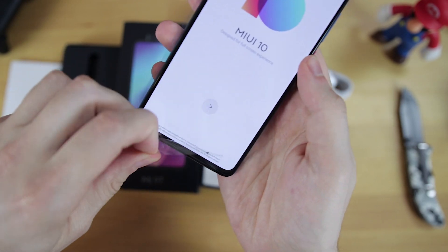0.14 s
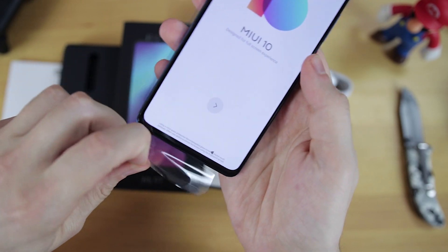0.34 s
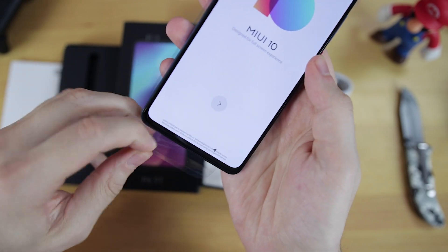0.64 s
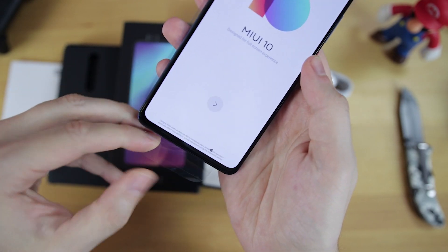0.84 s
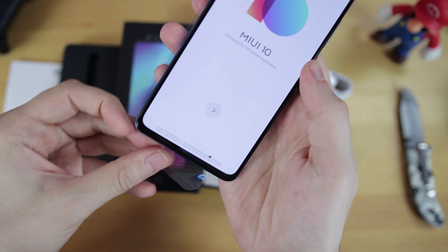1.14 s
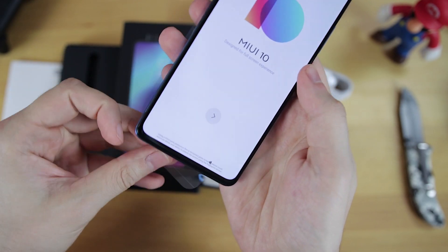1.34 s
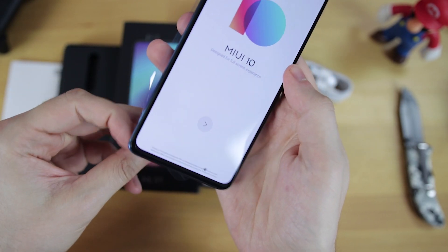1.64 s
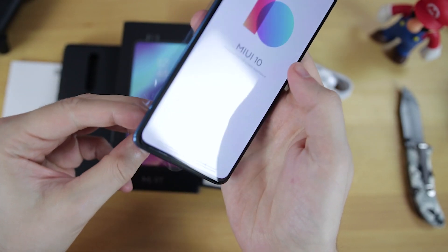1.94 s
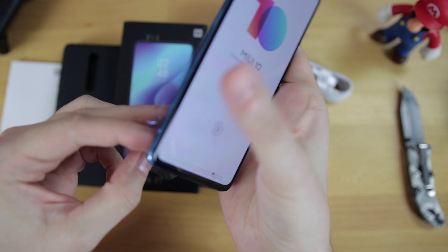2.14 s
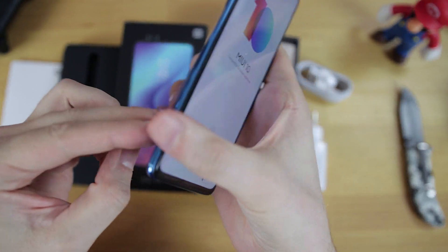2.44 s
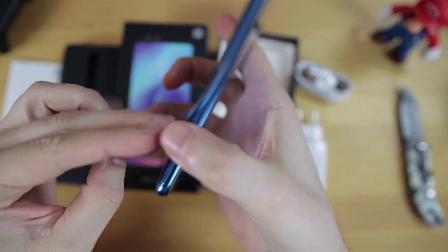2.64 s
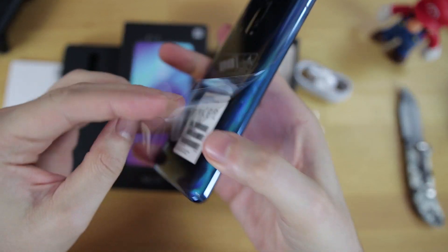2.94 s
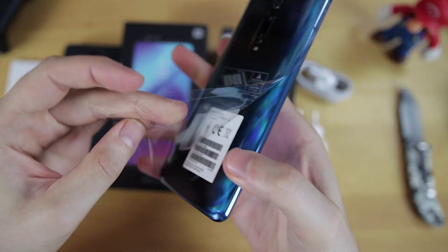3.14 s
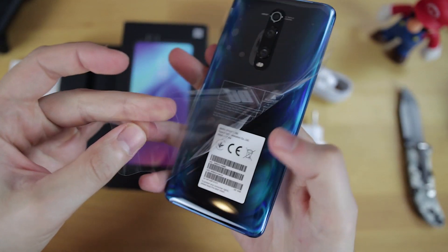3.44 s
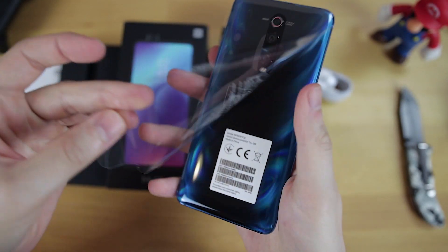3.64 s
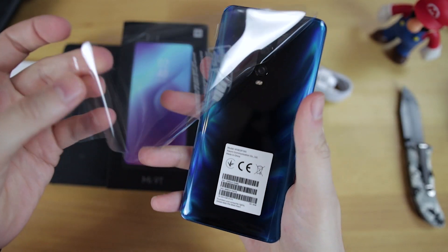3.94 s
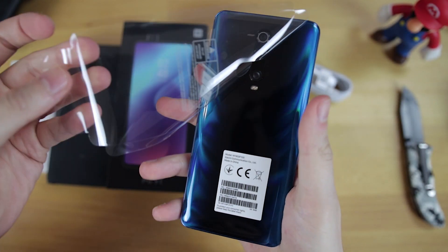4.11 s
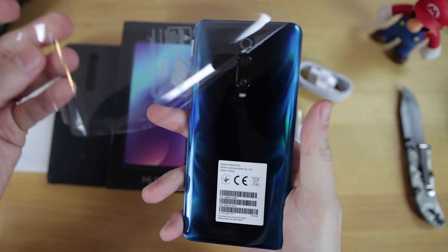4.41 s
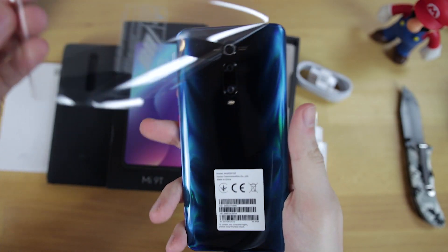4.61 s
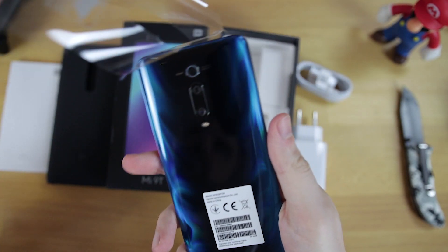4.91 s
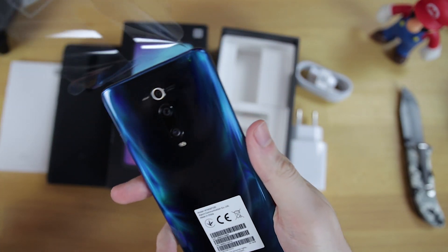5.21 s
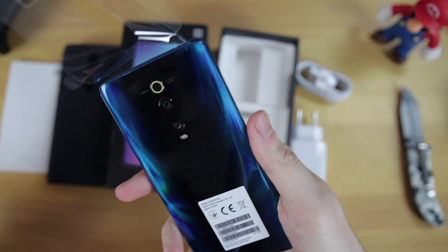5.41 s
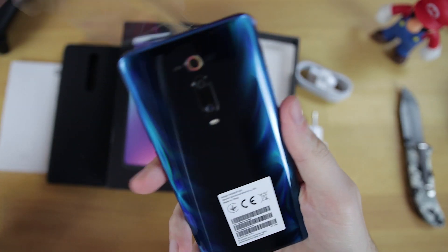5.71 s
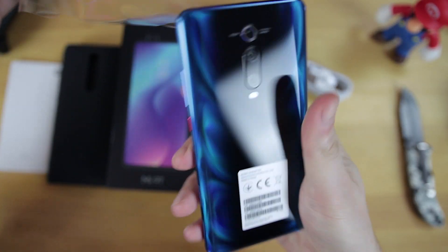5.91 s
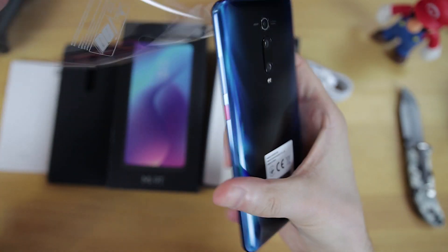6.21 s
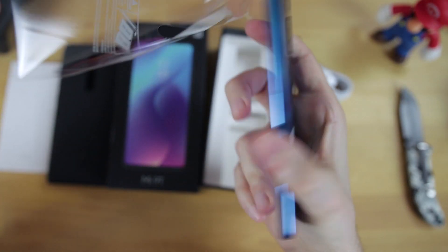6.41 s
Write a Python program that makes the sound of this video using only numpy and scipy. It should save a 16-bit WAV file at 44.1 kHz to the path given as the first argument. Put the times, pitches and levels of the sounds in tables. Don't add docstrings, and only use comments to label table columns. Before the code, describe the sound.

Close to the microphone in a quiet furnished room, fingers pick at thin plastic film on a phone. A few hard snaps come early, then small crackles and skin rubbing, another flapping snap, a dense patch of fine crinkling as the sheet lifts, a lull, and finally a cluster of loud cracks as it comes free. Faint ventilation and low hum stay beneath.

```python
import sys
import numpy as np
from scipy import signal
from scipy.fft import rfft, irfft
from scipy.io import wavfile
from scipy.ndimage import uniform_filter1d

SR = 44100
rng = np.random.default_rng(int(sys.argv[2]) if len(sys.argv) > 2 else 0)


def transcribe(u):
    v = np.clip(np.atleast_2d(u).T, -1, 1)
    q = np.round(v * 32767).astype(np.int16)
    wavfile.write(sys.argv[1], SR, q)


def decibels_to_gain(level_db):
    exponent = np.asarray(level_db, float) / 20
    return 10 ** exponent


N = 289296

# (frequency [Hz], density [dB per Hz])
AIR_SPECTRUM = [(15, -35), (25, -10.5), (60, -12), (90, -7), (170, -9.5), (300, 1), (400, -5), (840, -9),
                (1000, -14.5), (1900, -25.5), (3800, -28), (9000, -28.5), (15300, -25), (15850, -26)]
AIR_DB = -62
# (frequency [Hz], level [dB rms])
HUM_LINES = [(59.2, -80.5), (118.4, -71), (177.6, -73.5), (301.5, -78)]
# (time [s], level [dB])
HUM_SWELL = [(0, 5), (.4, 1), (.52, 10), (.7, 2.5), (1.1, 5), (1.6, -4.5), (2.2, 8), (3.6, 2), (5.5, 4),
             (6, 11), (6.56, 8)]
# (frequency [Hz], density [dB per Hz])
INPUT_HISS_SPECTRUM = [(40, -4), (600, -3.5), (2500, -7), (10000, 1), (12800, -0.5), (13500, -3.5),
                       (16000, -12)]
INPUT_HISS_DB, CUTOFF_HZ = -77.5, 17300

# (peak time [s], length [s], hiss level [dB], scuff level [dB])
STROKES = [(0.288, 0.043, -72, -60.5), (0.637, 0.14, -80, -67), (0.734, .1, -65, -85),
           (1.447, .15, -72, -87), (1.815, 0.22, -65, -68), (2.156, 1, -67.5, -71),
           (2.305, 0.2, -56, -64.5), (2.654, 0.091, -51.5, -55.5), (2.732, 0.29, -54.5, -63),
           (2.9, 0.14, -72, -68), (3.066, 0.79, -63, -72.5), (3.148, .15, -70, -79),
           (3.43, 0.2, -61.5, -66), (3.633, 0.3, -57.5, -72), (3.783, 0.26, -61.5, -66),
           (3.962, 0.24, -70, -68), (4.26, 0.56, -74, -71.5), (4.99, 0.12, -77, -68.5),
           (5.316, 0.6, -78, -68), (5.598, 0.14, -53, -85), (5.673, 0.074, -66, -72),
           (5.943, 0.65, -58, -67), (6.142, 0.23, -56.5, -85), (6.211, 0.12, -47, -64),
           (6.279, 0.25, -61, -69), (6.57, 0.12, -50.5, -63)]
STROKE_FADE_DB, ATTACK_SHARE, RESTING_HISS_DB, RESTING_SCUFF_DB = 33, 0.96, -74, -86.5
# (frequency [Hz], density [dB per Hz])
RUB_SPECTRUM = [(2000, -2.5), (3500, -5), (5500, -5.5), (8000, -1), (10500, -5.5), (12500, -4), (15800, -4)]
RUSTLE_EDGES_HZ = [1500, 3000, 5000, 7000, 9500, 12500, 17000]
RUSTLE_SWELL_DB = 1.0

# (start time [s], length [s], mean energy [dB])
CRINKLES = [
    (0.162, 0.23, -41.5),
    (1.598, 0.36, -41),
    (3.334, 0.14, -44),
    (3.688, 0.084, -34.5),
    (4.007, 0.12, -46),
    (5.3, 0.12, -56),
    (5.993, 0.12, -42),
]
CRINKLE_SPREAD_DB, CRINKLE_TILT_DB = -0.5, 5
# (time [s], energy [dB], treble tilt [dB])
PICKING = [(.1839, -46.5, 8), (.2055, -32.5, 5), (.4722, -34, 15), (.5455, -34, -16), (.5839, -23.5, 5),
           (.6924, -38, 25), (.7158, -32.5, 0), (.8405, -36, 6), (1.015, -51, -21), (1.0823, -27.5, 3),
           (1.2966, -19.5, 17), (1.3596, -28.5, 16), (1.4066, -22, 13), (1.4294, -25, 10),
           (1.445, -26.5, 7), (1.4713, -33, 9), (1.5811, -27, 7), (1.7951, -37, -3), (1.8212, -34, -9),
           (1.8591, -38, -10), (1.9889, -34.5, 4), (2.031, -32.5, -20), (2.2403, -24, 16), (2.2953, -23, 7),
           (2.3033, -28, -2), (2.3126, -27, 4), (2.3291, -28, -2), (2.5673, -39, 5), (2.6398, -30, 4),
           (2.6655, -29, 12)]
# (time [s], energy [dB], treble tilt [dB])
PEELING = [(2.9484, -37, 16), (3.1305, -26, -15), (3.4443, -25.5, -15), (3.548, -26, 1), (3.5822, -37, -2),
           (3.6066, -35, 8), (3.6194, -32, 10), (3.637, -20, 9), (3.6534, -39, -7), (3.668, -32, 2),
           (3.681, -30.5, 0), (3.6914, -30, 6), (3.7203, -35, 6), (3.7443, -43, 1), (3.7691, -28, 7),
           (3.782, -30, 2), (3.81, -35, -1), (3.816, -21, 5), (3.847, -27, 1), (3.8533, -28.5, 18),
           (3.9135, -39, 16), (4.0095, -22, 2.5), (4.046, -31.5, -10), (4.077, -31.5, 2), (4.17, -31, 1),
           (4.1823, -20.5, 4), (4.262, -30.5, 4)]
# (time [s], energy [dB], treble tilt [dB])
LETTING_GO = [(4.423, -37.5, 5), (4.4455, -25.5, 2), (4.482, -37.5, 1), (4.549, -33.5, 3), (4.5955, -33, 0),
              (4.6251, -37, 4), (4.6769, -28.5, 5), (4.7, -38, 1), (4.7173, -39, 10), (4.7442, -31.5, 12),
              (4.769, -33, 17), (4.9832, -44, 19), (5.2001, -14, 16.5), (5.2144, -24.5, 11),
              (5.229, -34, 6), (5.25, -34.5, 5), (5.4494, -25.5, 2), (5.51, -39, 15), (5.6693, -26, 7),
              (6.009, -36, 8), (6.0434, -38, 16), (6.061, -26.5, 9), (6.0724, -30.5, 14), (6.0797, -36, 0),
              (6.5217, -33, -3)]
CREASE_MS, CREASE_DB, SLOWER_PER_DB = 0.95, -29, 0.2
FAINT_DB = -18
# (frequency [Hz], width [Hz], level [dB])
FILM_MODES = [(3540, 4500, -4), (6620, 6100, -5), (7770, 1860, 25.5), (12000, 4400, 17), (16700, 4700, 8)]
# (time [s], frequency [Hz], energy [dB])
FLAPS = [(0.2, 2850, -32), (0.3536, 1080, -9), (.4371, 1970, -9), (1.1147, 1780, -18), (1.418, 584, -23),
         (1.46, 477, -26.5), (1.8684, 2500, -29), (2.0295, 830, -21.5), (2.0484, 1190, -27.5),
         (2.279, 840, -26), (2.34, 2840, -25.5), (2.348, 2330, -19), (2.6505, 640, -28),
         (2.6728, 473, -20.5), (2.7266, 995, -8), (3.1248, 930, -23), (3.4029, 580, -22),
         (3.5307, 1290, -21), (3.6289, 1320, -24.5), (4.0352, 380, -29), (4.832, 530, -23),
         (4.8344, 1780, -25.5), (5.5226, 1460, -16), (5.652, 1200, -29), (5.6866, 1140, -16.5),
         (5.7213, 1180, -11), (5.8556, 1970, -14), (5.9791, 655, -23), (6.0797, 352, -28.5),
         (6.1664, 845, -15)]
FLAP_MS, FLAP_ROOM_DB = 5.1, -0.5
FLAP_WIDTH_HZ, FLAP_ROOM_WIDTH_HZ = 61, 400
# (time [s], energy [dB], treble tilt [dB], length [ms])
SNAPS = [(.3522, -14.5, 9, 1.1), (.3542, -2.5, 6, 1.9), (.4371, -6, 4, 0.75), (1.1147, -4, 4.5, 2.8),
         (1.46, -24.5, -7, 5.6), (2.28, -18.5, 8, 6.2), (2.348, -20.5, 6, 5.9), (2.6466, -19.5, 17, 2.2),
         (2.6521, -19.5, 12, 4.9), (2.721, -31, 5, 7.4), (2.7267, -3, 5, 6), (3.1256, -24, 26, 2.8),
         (3.5314, -23.5, -29, .81), (3.6283, -29, 5, 6.3), (4.8259, -20, 23, 0.84), (4.8315, -17, -1, 1.6),
         (4.8348, -7.5, 10.5, 0.75), (4.838, -18.5, -14, 1.5), (5.5234, -5.5, 0, 1.3),
         (5.6864, -0.7, 11.5, 0.89), (5.7215, -2.5, 1.5, 1.4), (5.7558, -2, -6, 2.4), (5.7671, -4, 1, 2.3),
         (5.847, -25, -5, 4.9), (5.8556, -3, 3, 2), (6.1672, -8.5, 1, 1.4), (6.5404, -28, -4, 16)]

# (time [s], frequency [Hz], energy [dB])
THUDS = [(0.355, 375, -14.5), (.356, 517, -19), (.438, 835, -16.5), (1.118, 334, -18), (2.242, 107, -27.5),
         (2.669, 198, -26), (2.729, 344, -18), (2.73, 108, -22), (3.403, 560, -17.5), (3.415, 775, -30),
         (4.835, 135, -30), (5.524, 259, -24.5), (5.555, 497, -24.5), (5.69, 49.7, -29),
         (5.693, 258, -21.5), (5.766, 240, -16.5), (5.855, 322, -15), (5.856, 845, -16),
         (5.981, 225, -26.5)]
THUD_CYCLES, THUD_CUT_HZ = 5.9, 44
# (time [s], frequency [Hz], energy [dB], t60 [ms])
RINGS = [(.3545, 12000, -19, 4), (0.3546, 2040, -14, 2.5), (.438, 3680, -14, 10), (.4385, 2060, -17.5, 16),
         (.439, 2230, -15.5, 13), (1.1152, 540, -9.5, 9.7), (1.116, 630, -9, 14.6), (1.119, 730, -15, 21),
         (.355, 1510, -13.5, 10), (.4375, 1130, -24, 6.1), (5.524, 970, -21, 3.7), (2.73, 2980, -16.5, 6.9),
         (1.1157, 1220, -22, 17), (5.524, 2780, -15.5, 4.8), (5.687, 4140, -26, 3.3),
         (5.767, 2630, -17, 6.5), (1.115, 3500, -23, 7.7), (2.35, 2230, -31, 8), (2.35, 2600, -33, 8),
         (2.73, 1490, -14.5, 8.7), (5.5234, 15300, -3, 2.2), (5.5228, 12000, -5.5, 3.8),
         (5.524, 5660, -5.5, 1.5), (5.6863, 6470, -1, 1.8), (5.722, 1276, -13, 13), (5.736, 1410, -22, 5.9),
         (5.758, 1780, -10, 0.84), (5.79, 2680, -14, 10), (5.855, 3310, -9.5, 9.1), (6.167, 4280, -6, 2.2)]
# (time [s], frequency [Hz], energy [dB], t60 [ms])
TICKS = [(1.8585, 5360, -34, 2), (1.9306, 3500, -47, 1), (1.931, 7500, -48, 1), (1.94, 8000, -44, 0.99),
         (2.03, 3400, -29, 2.3), (2.03, 1400, -32, 2), (2.049, 1700, -34, 2), (2.606, 13000, -42, .8),
         (.367, 12500, -24, 1.5), (2.707, 12000, -38, 2), (2.03, 650, -30, 5), (2.049, 700, -31, 5),
         (2.0483, 2900, -31, 2.3), (2.28, 5400, -24, 2.1), (2.2795, 11000, -24, 1), (2.2403, 12000, -30, 1),
         (2.349, 3600, -25, 2.3), (2.349, 6700, -23.5, 2), (1.0155, 5100, -42, 4), (.845, 7000, -41, 2),
         (.834, 12000, -44, 1), (1.084, 5200, -31, 5), (1.084, 6400, -36, 3), (.5965, 9000, -38, 2),
         (.399, 8500, -32, 1.5), (3.913, 8400, -40, 2), (6.271, 14000, -42, 1), (6.555, 12000, -34, 1),
         (2.915, 1440, -39, 3), (3.348, 7400, -45, .8), (3.378, 1400, -41, 4), (3.392, 1500, -37, 5),
         (3.4442, 2600, -31, 3), (3.444, 1100, -37, 4), (3.695, 8300, -38, 1), (3.705, 8300, -37, 1),
         (3.733, 8000, -40, 1)]
# (time [s], frequency [Hz], energy [dB], t60 [ms])
LATE_TICKS = [(5.326, 6000, -46, .8), (5.342, 6500, -52, .8), (5.389, 4500, -47, .8),
              (5.407, 4500, -48, .8), (5.462, 13000, -42, .8), (5.535, 9000, -24, .8),
              (5.535, 4000, -20, 2), (5.574, 14000, -30, .8), (5.652, 1350, -25, 6.8),
              (5.662, 1300, -32, 5), (5.671, 1350, -31, 5), (5.698, 4700, -18, 1.8), (5.745, 1250, -23, 6),
              (5.848, 1700, -18.5, 3.7), (5.976, 13000, -45, .8), (5.99, 2800, -33, 2.9),
              (5.995, 13000, -40, .8), (6.002, 13000, -38, 0.73), (6.037, 7500, -33, 1),
              (6.037, 13500, -36, .8), (6.05, 7500, -36, 1), (3.63, 5500, -28, 1.5), (3.74, 12500, -38, .8),
              (3.758, 12500, -42, .8), (4.07, 8000, -34, 1), (4.037, 4000, -32, 1.1)]
SINGING_S = [.447, .45, .365, .37, 1.145, 1.13, 1.14, 1.125, 2.36, 2.36, 2.33, 2.74, 2.98, 3.05, 3.68, 3.66,
             3.7, 5.56, 5.57, 5.79, 5.87, 6.07, 6.06, 6.21, 6.21, 6.26, 6.54]
# (rise [s], fall [s], frequency [Hz], level [dB])
SINGING = [(.006, .2, 2000, -56), (.006, .18, 3700, -62), (.006, .12, 8000, -55), (.01, .1, 500, -55),
           (.02, .12, 630, -49), (.01, .12, 780, -54), (0.022, .12, 470, -51), (.006, 0.15, 2400, -61),
           (.006, .2, 2450, -65), (.01, .1, 7000, -64), (.06, .08, 5300, -63), (.006, 0.14, 1500, -54),
           (.15, .25, 13200, -70), (.2, .15, 8400, -68), (.12, 0.13, 8250, -64), (.1, 0.13, 5300, -65),
           (.1, .15, 12800, -67), (.03, .15, 6000, -55), (.04, .15, 12500, -58), (.02, .12, 3000, -50),
           (.006, .12, 3150, -53), (.15, .15, 8000, -63), (.15, .15, 12000, -65), (.04, 0.072, 9600, -56),
           (.04, 0.12, 4330, -58), (.05, .15, 7000, -63), (.06, .1, 7900, -61)]
SINGING_WIDTH_SHARE, SINGING_FADE_DB = .14, 25

# (delay [ms], energy [dB])
ECHOES = [(.8, -11.5), (2.5, -18.5), (10.5, -17.5), (16, -23.5), (24, -22.5)]
# (frequency [Hz], t60 [s])
ROOM_T60 = [(150, 1), (500, 0.4), (1500, 0.43), (4000, 0.39), (9000, 0.39), (16000, 0.26)]
# (frequency [Hz], level [dB])
ROOM_COLOUR = [(150, -18), (500, 5.5), (1500, 2.5), (4000, -2), (9000, -5), (16000, -6)]
# (time [s], level [dB])
OPENNESS = [(.35, 1), (.44, 4), (1.1, 2), (1.3, 0.5), (2.73, -2), (3.4, -1), (4.83, 1.5), (5.2, -1.5),
            (5.52, 1), (5.7, 6.5), (5.86, -2), (6.17, -5)]
ROOM_DB, ROOM_GAP_MS = -10, 7.3
STEADY_TOP_HZ, TOP_GATE_DB, TOP_JUMP = 15850, -55, 5


def rms_one(x):
    return x / np.sqrt(np.mean(x ** 2) + 1e-20)


def at_hz(points, hz):
    points = np.array(points)
    return np.interp(np.log(hz), np.log(points[:, 0]), points[:, 1])


def at_time(points):
    return np.interp(np.arange(N) / SR, *np.transpose(points))


def band(x, low_hz, high_hz, order=2):
    edges_hz = [low_hz, min(high_hz, .45 * SR)]
    return signal.sosfilt(signal.butter(order, edges_hz, "band", fs=SR, output="sos"), x)


def resonance(x, hz, width_hz):
    r = np.exp(-np.pi * width_hz / SR)
    poles = [1, -2 * r * np.cos(2 * np.pi * hz / SR), r * r]
    return signal.lfilter([(1 - r * r) / 2, 0, (r * r - 1) / 2], poles, x)


def drift(rate_hz):
    r = np.exp(-80 * np.pi * rate_hz / SR)
    slow = signal.lfilter([1], [1, -2 * r, r * r], rng.standard_normal(N // 40 + 2002))[2000:]
    return np.interp(np.arange(N) / 40, np.arange(len(slow)), rms_one(slow))


def coloured(x, spectrum):
    hz = np.maximum(np.fft.rfftfreq(N, 1 / SR), 1)
    inside = (hz > spectrum[0][0] / 2) & (hz < spectrum[-1][0])
    return rms_one(irfft(rfft(x) * decibels_to_gain(at_hz(spectrum, hz)) * inside, N))


def add(out, s, sound, energy_db):
    i = int(s * SR)
    sound = sound[:N - i]
    out[i:i + len(sound)] += sound * decibels_to_gain(energy_db) / np.sqrt(np.sum(sound ** 2) + 1e-20)


def uneven_slips(size, uneven_db, most):
    return rng.standard_normal(size) * decibels_to_gain(uneven_db * np.minimum(rng.exponential(1, size), most))


def background():
    t = np.arange(N) / SR
    swell_db = at_time(HUM_SWELL)
    hum = np.zeros(N)
    for hz, db in HUM_LINES:
        level = decibels_to_gain(db - 2.0 + swell_db + 3.5 * drift(19.0))
        hum += level * np.sin(2 * np.pi * hz * t + .5 * drift(0.4))
    gust = decibels_to_gain(1.96 * drift(12.3))
    air = coloured(rng.standard_normal(N), AIR_SPECTRUM)
    rumble = band(air, 12, 900, order=1)
    return decibels_to_gain(AIR_DB) * (air + (gust - 1) * rumble) + hum


def stroke_levels():
    t = np.arange(0, N, 64) / SR
    s, length_s, hiss_db, scuff_db = np.transpose(STROKES)[:, :, None]
    fade_db = STROKE_FADE_DB * np.maximum((s - t) / ATTACK_SHARE, t - s) / length_s
    levels = []
    for db, rest_db in ((hiss_db, RESTING_HISS_DB), (scuff_db, RESTING_SCUFF_DB)):
        loudest_db = np.maximum(np.max(db - fade_db, axis=0), rest_db)
        levels.append(np.interp(np.arange(N) / SR, t, loudest_db))
    return levels


def rubbing():
    hiss_db, scuff_db = stroke_levels()
    slips = uneven_slips(N, uneven_db=3.8, most=5)
    rustle = np.zeros(N)
    for k, (low_hz, high_hz) in enumerate(zip(RUSTLE_EDGES_HZ, RUSTLE_EDGES_HZ[1:])):
        rustle += (-1) ** k * band(slips, low_hz, high_hz) * decibels_to_gain(RUSTLE_SWELL_DB * drift(3.2))
    hiss = coloured(rustle, RUB_SPECTRUM) * decibels_to_gain(hiss_db + .5 * drift(51))
    catches = rng.standard_normal(N) * (0.017 + (rng.random(N) < 250 / SR))
    hollow = resonance(resonance(catches, hz=1450, width_hz=450), hz=1400, width_hz=600)
    pips = rms_one(hollow) + .3 * rms_one(band(catches, 300, 3000))
    return hiss + rms_one(pips) * decibels_to_gain(scuff_db + 2.0 * drift(34))


def buckle(length_ms, uneven_db, size=1024, count=25):
    t = np.arange(size) / SR * 1000 / max(length_ms, .3)
    rise = np.minimum(t * length_ms / (0.63 + 0.053 * length_ms), 1) ** 2
    shape = rise * (np.exp(-1.8 * t ** 0.88) + 0.099 * np.exp(-t))
    spectrum = rfft(shape * uneven_slips(size, uneven_db, most=4))
    broad = np.sqrt(uniform_filter1d(np.abs(spectrum) ** 2, size=count))
    return irfft(spectrum / broad, size) * np.clip(20 * shape, 0, 1)


def creases():
    small = PICKING + PEELING + LETTING_GO
    for s, length_s, db in CRINKLES:
        for u, a, b in zip(rng.random(size=5), *rng.standard_normal(size=(2, 5))):
            small = small + [(s + length_s * u, db + CRINKLE_SPREAD_DB * a, CRINKLE_TILT_DB + 6 * b)]
    rows = list(SNAPS)
    for s, db, tilt_db in small:
        length_ms = CREASE_MS * np.exp(SLOWER_PER_DB * np.clip(CREASE_DB - db, 0, 12))
        rows.append((s, db, tilt_db, length_ms))
    return rows


def crack(volley, strengths_db, tilt_db):
    film = volley
    for (hz, width_hz, db), strength_db in zip(FILM_MODES, strengths_db):
        film = film + decibels_to_gain(db + strength_db - 11.5) * resonance(volley, hz, width_hz)
    return rms_one(band(film, 2720, 5330)) - decibels_to_gain(tilt_db) * rms_one(band(film, 8800, 20600))


def flap(volley, hz, width_hz):
    ring = resonance(volley, hz, width_hz + 0.032 * hz)
    snap = band(volley, hz / 2.2, hz * 2.2, order=1)
    return band(rms_one(ring) + 1.8 * rms_one(snap), hz / 3.7, hz * 5.1)


def cracks():
    direct, around = np.zeros((2, N))
    click = np.eye(1, 1024)[0]
    for s, energy_db, tilt_db, length_ms in creases():
        strengths_db = rng.normal(0, 7.9, len(FILM_MODES))
        count = 25 if energy_db > FAINT_DB else 70
        volley = buckle(length_ms, uneven_db=3.5, count=count)
        add(direct, s - .0004, crack(volley, strengths_db, tilt_db), energy_db)
        add(around, s - .0004, crack(click, strengths_db, tilt_db), energy_db)
    for s, hz, energy_db in FLAPS:
        volley = buckle(FLAP_MS, uneven_db=0.0)
        add(direct, s, flap(volley, hz, FLAP_WIDTH_HZ), energy_db)
        add(around, s, flap(click, hz, FLAP_ROOM_WIDTH_HZ), energy_db + FLAP_ROOM_DB)
    return direct, around


def thuds_and_rings():
    out, t = np.zeros(N), np.arange(8192) / SR
    knocks = [(s, hz, db, 1000 * THUD_CYCLES / hz) for s, hz, db in THUDS]
    for s, hz, energy_db, t60_ms in RINGS + TICKS + LATE_TICKS + knocks:
        decay = decibels_to_gain(-60000 * t / t60_ms) * (1 - np.exp(-t * hz))
        add(out, s, np.sin(2 * np.pi * hz * t) * decay, energy_db)
    return band(out, THUD_CUT_HZ, 20000)


def room(direct, around):
    t = np.arange(int(.6 * SR)) / SR
    tail, edges_hz = 0, 100 * 2 ** np.arange(0, 7.6, .5)
    for low_hz, high_hz in zip(edges_hz, edges_hz[1:]):
        hz = np.sqrt(low_hz * high_hz)
        decay_db = at_hz(ROOM_COLOUR, hz) - 60 * t / at_hz(ROOM_T60, hz)
        tail = tail + band(rng.standard_normal(len(t)), low_hz, high_hz) * decibels_to_gain(decay_db)
    spectrum = rfft(tail)
    fine, broad = (uniform_filter1d(np.abs(spectrum) ** 2, size=size) for size in (36, 240))
    tail = irfft(spectrum * np.sqrt(broad / fine), len(t))
    tail = tail * np.clip((t * 1000 - ROOM_GAP_MS + 10.0) / 11.0, .05, 1)
    tail = tail * np.clip((t[-1] - t) / .1 - .3, 0, 1)
    answer = np.zeros(N)
    add(answer, 0, tail, ROOM_DB)
    for ms, db in ECHOES:
        add(answer, ms / 1000, buckle(2.9 + 0.2 * ms, uneven_db=-0.5), db)
    answer = signal.sosfilt(signal.ellip(12, .5, 70, 15800, fs=SR, output="sos"), answer)
    around = around * decibels_to_gain(at_time(OPENNESS))
    return direct + signal.fftconvolve(around, answer[:len(t)])[:N]


def singing():
    out, t, slips = np.zeros(N), np.arange(N) / SR, rng.standard_normal(N)
    for s, (rise_s, fall_s, hz, db) in zip(SINGING_S, SINGING):
        near = slice(max(int((s - 2 * rise_s) * SR), 0), int((s + 2 * fall_s) * SR))
        width_hz = SINGING_WIDTH_SHARE * hz
        fade_db = SINGING_FADE_DB * np.maximum((s - t[near]) / rise_s, (t[near] - s) / fall_s)
        tone = resonance(resonance(slips[near], hz, width_hz), hz, width_hz)
        out[near] += rms_one(tone) * decibels_to_gain(db - fade_db)
    return out


def scene():
    air, rubs = background(), rubbing()
    direct, around = cracks()
    rings = thuds_and_rings()
    rings_around = decibels_to_gain(0.5) * band(rings, 23, 4100, order=1)
    mono = room(direct + rings + rubs, around + rings_around + rubs) + air + singing()
    return np.array([mono, mono])


def top_gate(x):
    hz = np.fft.rfftfreq(N, 1 / SR)
    top = irfft(rfft(x) * np.clip((hz - STEADY_TOP_HZ) / 300 + .6, 0, 1), N)
    fast, slow = (uniform_filter1d(top ** 2, size=size) for size in (128, 2048))
    sharp = (fast > TOP_JUMP * slow) & (fast > decibels_to_gain(2 * TOP_GATE_DB))
    passing = uniform_filter1d(1. * sharp, size=96)
    return x - top * (1 - passing)


def low_pass(x):
    return signal.sosfilt(signal.butter(12, 17130, fs=SR, output="sos"), x)


def record(dry):
    side = decibels_to_gain(INPUT_HISS_DB) * coloured(rng.standard_normal(N), INPUT_HISS_SPECTRUM)
    both = top_gate(dry[0]) + side * [[1], [-1]]
    mix = signal.sosfilt(signal.cheby2(10, 50, CUTOFF_HZ, fs=SR, output="sos"), both)
    return low_pass(mix)


dry = scene()
out = record(dry)
transcribe(out)
```